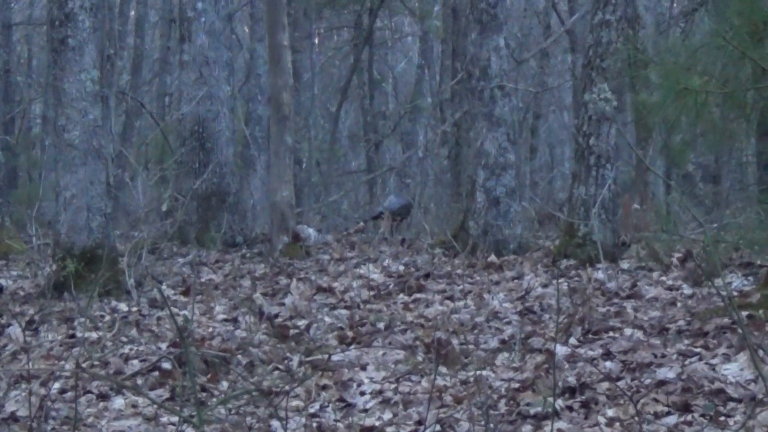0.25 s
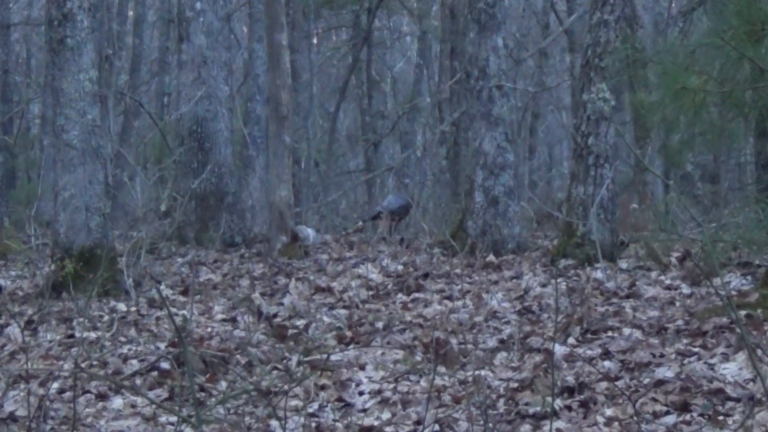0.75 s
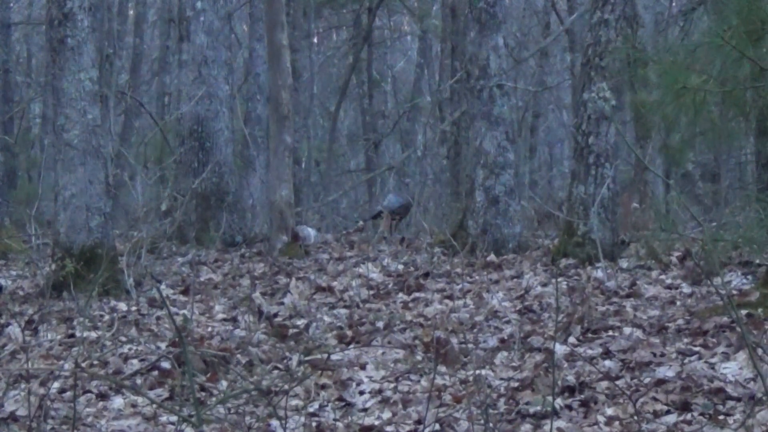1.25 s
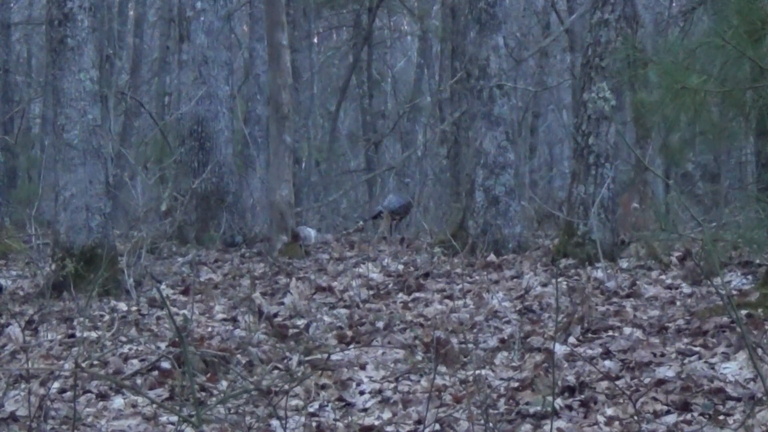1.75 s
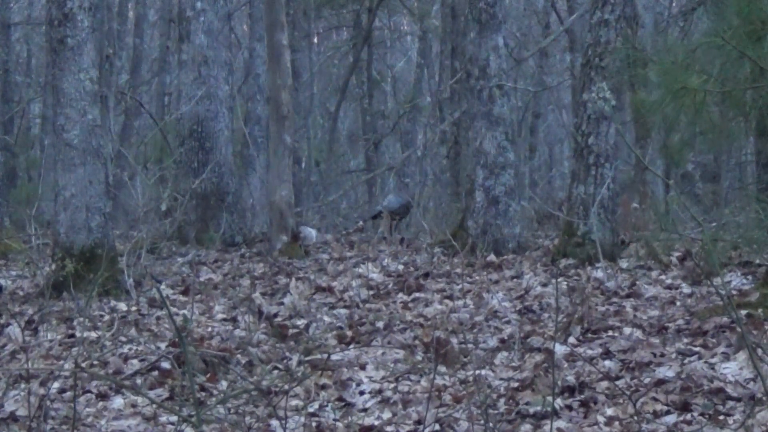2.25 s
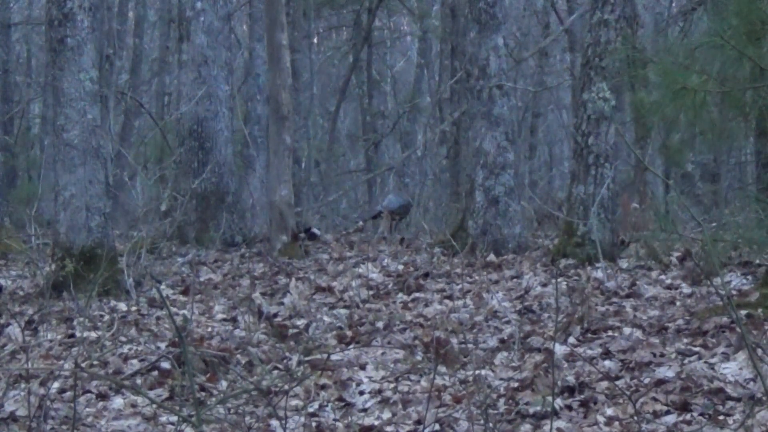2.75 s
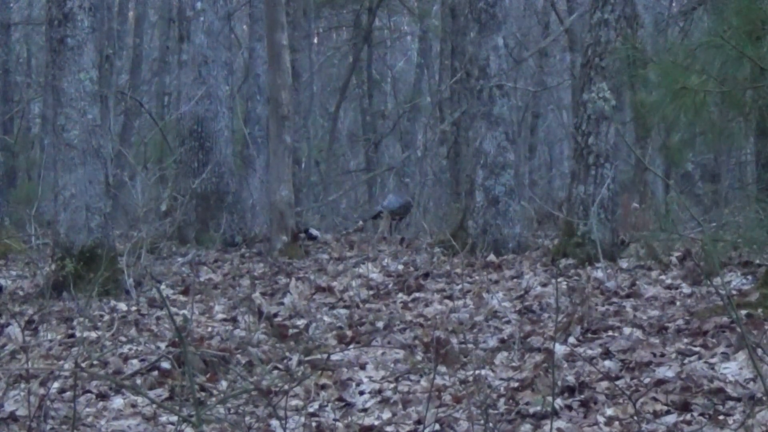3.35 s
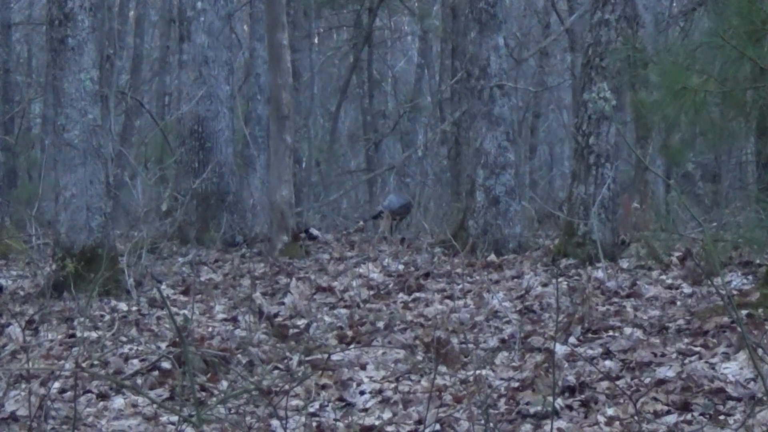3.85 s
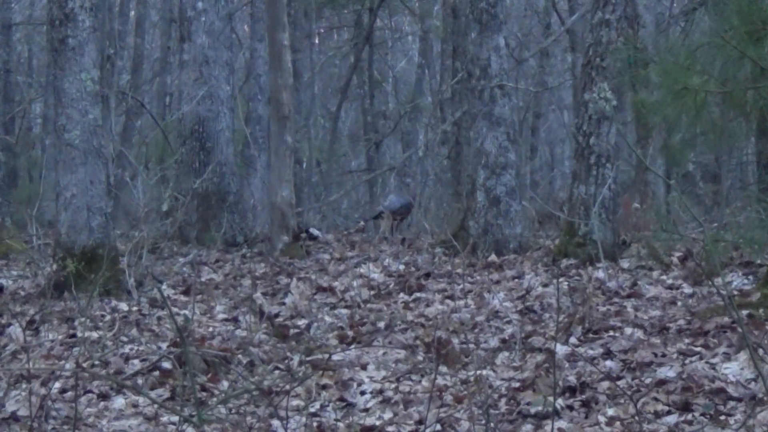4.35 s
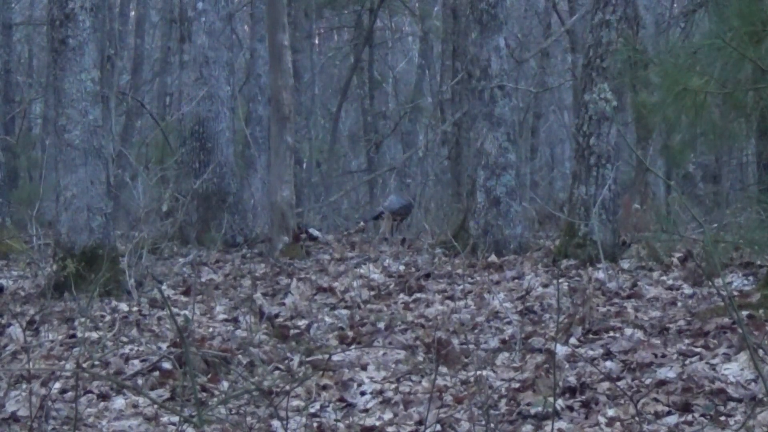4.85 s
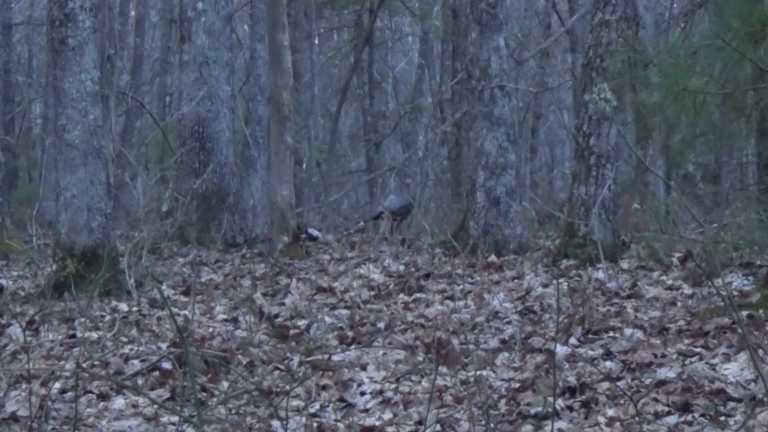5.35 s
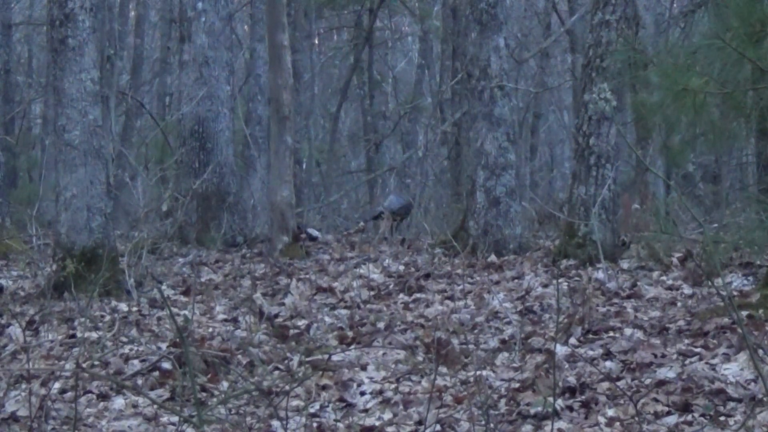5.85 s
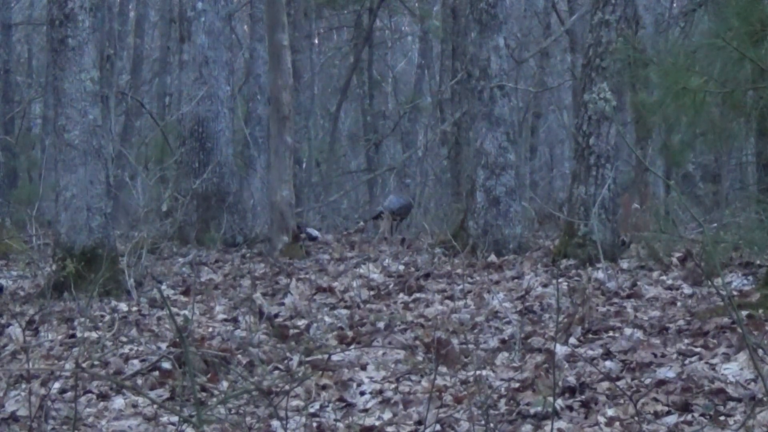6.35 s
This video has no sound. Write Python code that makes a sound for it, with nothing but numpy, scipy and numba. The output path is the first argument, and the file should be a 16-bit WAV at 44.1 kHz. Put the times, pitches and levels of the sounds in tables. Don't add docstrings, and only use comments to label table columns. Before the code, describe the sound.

Dry leaf litter crackles densely as large birds scratch on a forest floor, with sharp stem snaps and faint chirps over a soft hiss.

```python
import sys
import numpy as np
from scipy import signal
from scipy.fft import rfft, irfft, next_fast_len
from scipy.io import wavfile
from numba import njit

SR = 44100
rng = np.random.default_rng(int(sys.argv[2]) if len(sys.argv) > 2 else 0)


def output_pcm(signal):
    pcm = np.clip(np.atleast_2d(signal).T, -1, 1) * 32767
    wavfile.write(sys.argv[1], SR, np.round(pcm).astype(np.int16))


def how_loud(loudness_db):
    steps = np.asarray(loudness_db, float) / 20
    return 10 ** steps


N = 291501


def shaped(x, table):
    hz, db = np.transpose(table)
    size = next_fast_len(N + 8192)
    grid = np.maximum(np.arange(4097) * SR / 8192, 1)
    log_gain = np.interp(np.log(grid), np.log(hz), db) * np.log(10) / 20
    cepstrum = irfft(log_gain)
    cepstrum[1:4096] *= 2
    cepstrum[4097:] = 0
    impulse = irfft(np.exp(rfft(cepstrum)))
    return irfft(rfft(x, size) * rfft(impulse, size), size)[..., :N]


@njit
def ring(start, hz, cycles, size, side, turn):
    out = np.zeros((2, N + 8192))
    for k in range(len(start)):
        step = 2 * np.pi * hz[k] / SR
        decay_and_turn = np.exp(1j * step - hz[k] / (cycles[k] * SR))
        z = size[k] * np.exp(1j * turn[k])
        length = min(int(6 * cycles[k] * SR / hz[k]), 8000)
        for i in range(start[k], start[k] + length):
            out[0, i] += z.imag
            out[1, i] += z.imag * side[k]
            z *= decay_and_turn
    return out[:, :N]


def grains(s, hz, cycles, size, pan_db, scatter, chance):
    side = np.tanh(pan_db * np.log(10) / 40) + scatter * (2 * chance[0] - 1)
    sign = np.sign(chance[1] - .5)
    start = np.clip(s * SR, 0, N - 1).astype(np.int64)
    hz = np.clip(hz, 100., .42 * SR)
    cycles = np.clip(cycles, .2, 9)
    return ring(start.ravel(), hz.ravel(), cycles.ravel(), (size * sign).ravel(), side.ravel(),
                (.5 * chance[2]).ravel())


# pitch_hz, level_db [dB per Hz]
WIND_SPECTRUM = [(15, -50), (25, -49), (76, -6.5), (260, -12), (403, -5.5), (600, -5), (780, -21),
                 (1320, -120)]


def air():
    mid, side = shaped(rng.standard_normal((2, N)), WIND_SPECTRUM + [(1200, -76.5)])
    return how_loud(-64.5) / np.std(mid) * np.array([mid + 0.094 * side, mid - 0.15 * side])


# pitch_hz, level_db [dB per Hz]
HUSH_SPECTRUM = [(180, -20), (300, -11.5), (701, 10), (1390, 5.5), (2880, 8.5), (8790, -4.5), (10900, -16),
                 (15000, -6), (16000, -23)]


def hush():
    hiss = shaped(rng.standard_normal((2, N)), HUSH_SPECTRUM)
    side_db = -9.0
    return how_loud(-53.5) * hiss / np.std(hiss) * how_loud(np.array([[0], [side_db]]))


def calls(notes):
    out = np.zeros((2, N + SR))
    for s, ms, from_hz, to_hz, db, pan_db in notes:
        samples = ms * SR / 1000
        u = np.arange(int(samples * 2.1)) / samples
        waver = how_loud(4.0 * np.interp(u * ms / 5, np.arange(30), rng.standard_normal(30)))
        shape = np.minimum(u / 0.26, 1) * np.exp(-np.maximum(u - .7, 0) / 0.21) * waver
        blur = 1 + .008 * np.interp(u * ms / 7, np.arange(30), rng.standard_normal(30))
        hz = (from_hz + (to_hz - from_hz) * u) * blur
        tone = np.sin(2 * np.pi * np.cumsum(hz) / SR)
        level = how_loud(db + np.array([[pan_db], [-pan_db]]) / 2)
        at = int(s * SR)
        out[:, at:at + len(u)] += np.sqrt(2) * shape * tone * level
    return out[:, :N]


def chorus(birds, count):
    from_s, to_s, low_hz, high_hz, db = birds
    when, pitch, strength, drift = rng.random((count, 4)).T
    s = from_s + (to_s - from_s) * when
    hz = low_hz + (high_hz - low_hz) * pitch
    end_hz = hz * (.94 + 0.112 * drift)
    ms = 12 + 18 * strength
    return calls(np.transpose([s, ms, hz, end_hz, db + 5.8 * strength, 7.8 * drift - 5.0]))


# start_s, end_s, low_hz, high_hz, level_db [rms of a note]
DEEP_WOOD_BIRDS = (5, 6.6, 3500, 4911, -66.5)
# start_s, end_s, low_hz, high_hz, level_db [rms of a note]
NEARER_TWITTER = (1.95, 2.25, 3400, 4600, -68)


def songbirds():
    return chorus(DEEP_WOOD_BIRDS, count=1100) + chorus(NEARER_TWITTER, count=40)


# start_s, length_ms, pitch_hz, level_db [rms], left_minus_right_db
CHIRP_NOTES = [(0.511, 8.7, 5500, -37, -10), (1.057, 6, 4070, -37, -3), (1.93, 22, 3350, -55, 14),
               (1.95, 36, 3510, -57, 8), (2.02, 31, 3500, -56, 6), (2.045, 26, 4120, -52, 3.5),
               (2.1, 50, 3480, -57, 6), (2.16, 22, 3460, -55, 6), (1.89, 80, 1146, -63, 0),
               (2.18, 110, 1160, -63, 6), (2.28, 90, 1170, -60, 0), (2.41, 140, 1170, -61.5, 6),
               (2.56, 87, 1130, -63, 2), (1.98, 30, 3500, -52, 5), (2.055, 32, 3480, -54, 6),
               (2.075, 25, 4370, -52, 3.5), (2.112, 36, 4120, -54, 3.5), (4.17, 20, 700, -47, -2.5),
               (4.2, 21, 712, -48.5, -2.5), (4.19, 16, 3940, -41, -5.5), (5.2, 44, 3520, -60, -7),
               (5.245, 36, 2950, -56, -12), (5.29, 59, 3430, -53, -10), (6.017, 12, 1145, -43.5, -5.5)]


def chirps():
    return calls([(s, ms, hz, hz, db, pan_db) for s, ms, hz, db, pan_db in CHIRP_NOTES])


# start_s, length_ms, pitch_hz [at start], level_db [rms],
# left_minus_right_db
CLUCK_NOTES = [(4.748, 6.5, 956, -45, 2), (4.836, 6.6, 1320, -44.5, 3), (4.886, 6, 1030, -44.5, 2),
               (.758, 4.5, 3420, -35, -1), (.7725, 3.8, 1340, -32.5, 10), (1.032, 3.7, 1630, -40, 14),
               (1.243, 1.76, 3900, -25, 3), (2.325, 5.1, 1390, -48, 17.5), (2.9285, 2, 4070, -33, 2),
               (3.072, 11.3, 845, -39.5, 4), (4.058, 8.5, 1096, -42, 2), (4.443, 8.4, 3730, -29.5, -11),
               (4.595, 11, 5910, -35, -5.5), (4.619, 4.9, 1085, -30.5, -1)]


def clucks():
    return calls([(s, ms, hz, hz * (1 - 0.07), db, pan_db) for s, ms, hz, db, pan_db in CLUCK_NOTES])


def knocks(table, count, ms, cycles, octaves, db):
    s, peak_db, hz = np.transpose(table)[..., None]
    delay, pitch, side, sign, phase = rng.random((len(table), count, 5)).transpose(2, 0, 1)
    later = np.arange(count) > 0
    own_hz = hz * 2 ** (later * octaves * (pitch - .5))
    size = how_loud(peak_db + db) * np.where(later, .7 * (1 - delay), 1)
    start = s - .5 * cycles / hz + later * delay * ms / 1000
    chance = np.array([side, sign, phase])
    return grains(start, own_hz, cycles + 0 * own_hz, size, 1. + 0 * size, 0.34, chance)


# start_s, level_db [peak], pitch_hz
TOE_TAPS = [(.0035, -41, 610), (.081, -37, 483), (.134, -32, 1000), (.1916, -35, 746), (.222, -31, 1100),
            (.2951, -38, 750), (.305, -40, 420), (.3293, -39, 2600), (.449, -31, 1190), (.5323, -29, 1500),
            (.5445, -31, 2190), (.5455, -25.5, 3800), (.9132, -48, 520), (.9593, -34, 2600),
            (1.0075, -41, 1000), (1.1072, -38, 1570), (1.2435, -30, 2300), (1.2684, -43, 2700),
            (1.3896, -38, 2500), (1.8119, -46, 770), (2.1396, -45, 420), (2.186, -50.5, 450),
            (2.3362, -48, 600), (3.019, -35.5, 1400), (3.1077, -42, 1200), (3.161, -43, 645),
            (3.212, -31, 2100), (3.2571, -37, 1900), (3.285, -37, 3300), (3.294, -34, 3230),
            (3.3561, -43, 496), (3.6699, -39, 1800), (4.0785, -40, 1600), (4.3159, -40, 1000),
            (4.3506, -39, 700), (4.372, -48, 750), (4.386, -42, 750), (4.6217, -41, 750),
            (4.6355, -33, 1400), (4.6956, -34.5, 1800), (4.7594, -33, 1700), (4.817, -45, 454),
            (4.9004, -35, 1600), (5.1216, -49, 1700), (5.2097, -52, 1700), (5.8001, -43.5, 850),
            (5.856, -47, 437), (5.861, -40, 1300), (5.8635, -43.5, 402), (6.2041, -49, 600),
            (6.2263, -52, 600), (4.4465, -30, 3700), (4.36, -41, 1100), (4.464, -42, 650),
            (1.2428, -30, 1860), (1.244, -30, 3250), (.267, -33, 2500), (.241, -35, 1500),
            (3.235, -41, 1100), (3.078, -42, 700)]


def taps():
    return knocks(TOE_TAPS, count=3, ms=2.5, cycles=1.76, octaves=0.56, db=3.5)


# start_s, level_db [peak], pitch_hz
CRUMB_FLICKS = [(.0005, -18, 8500), (.0017, -25, 4500), (.0165, -24, 7600), (.0851, -22, 8500),
                (.0895, -28, 8500), (.1472, -35, 5500), (.1631, -38, 12500), (.1714, -27, 8800),
                (.1744, -27, 9500), (.1966, -31, 12500), (.2073, -27, 6500), (.3505, -38, 8500),
                (.4435, -30, 5500), (.5116, -27, 4040), (.5889, -34, 5000), (.5917, -34, 4960),
                (.5971, -37, 5000), (.7046, -31, 4000), (.7124, -32, 13000), (.7471, -30.5, 6000),
                (.8568, -36, 4500), (.9027, -41, 12500), (.9344, -28, 9500), (1.1382, -42, 12500),
                (1.5495, -37, 8800), (1.762, -38, 8800), (1.9538, -41, 12500), (2.4472, -38, 12500),
                (2.6562, -31, 9600), (2.6944, -32, 8200), (2.7014, -40, 13000), (2.769, -29.5, 8900),
                (2.8144, -33, 11000), (2.8403, -25, 9500), (3.099, -30.5, 8000), (3.212, -41, 12000),
                (3.2566, -30, 8500), (3.4751, -40, 11500), (3.7809, -34, 4500), (3.8834, -37, 12500),
                (4.2416, -30.5, 4460), (4.3105, -35, 10500), (4.3549, -31, 3200), (4.3568, -26, 3970),
                (4.3724, -27, 9500), (4.4024, -35, 10000), (4.4429, -27, 8000), (4.5564, -29, 6000),
                (4.5888, -29, 4500), (4.6242, -24.5, 3460), (4.6639, -29, 8800), (4.6699, -31, 8500),
                (4.7791, -43, 12500), (5.2568, -28, 8800), (5.5526, -30.5, 8860), (5.6963, -27.5, 4850),
                (5.8744, -36, 13000), (5.949, -36, 11000), (6.4, -43, 12500), (1.2427, -30, 6000)]


def flicks():
    return knocks(CRUMB_FLICKS, count=4, ms=1.2, cycles=2.4, octaves=0.6, db=5.5)


# pitch_hz, level_db [dB per Hz]
LEAF_COLOUR = [(120, -27.5), (200, -12), (482, -3), (558, -4), (709, -0.5), (1680, -1), (2020, -1),
               (2960, 0), (4520, -1), (8580, 1), (10500, -2.5), (15100, -17), (16000, -12)]


def leaf_colour_db(hz):
    table_hz, table_db = np.transpose(LEAF_COLOUR)
    return np.interp(np.log(hz), np.log(table_hz), table_db)


# start_s, level_db [peak], pitch_hz, left_minus_right_db, bright_part_db
STEM_BREAKS = [(0.0017, -19.5, 2930, 6, -5), (0.329, -34, 2800, 17, -8), (0.5113, -11.5, 3070, -4, -17),
               (0.7124, -18, 2710, -3, -13), (0.7322, -14.5, 2230, -3, -6.5), (0.7602, -16.5, 3060, 0, -13),
               (0.7755, -28, 1250, -3, -26), (1.0341, -14, 1620, 12, -22), (1.0586, -22, 4090, -7, -6.5),
               (1.2425, -5, 2940, 2, -30), (1.4921, -18.5, 2890, 10, -6), (2.455, -23, 2340, 13, -4),
               (3.3545, -21.5, 4560, 3, -3), (4.0626, -22, 1040, -1, -13), (4.1973, -15.5, 3960, -11, -27),
               (4.3638, -18, 3800, -9, -8), (4.4465, -27, 3550, -5.5, 7), (4.5427, -17, 2790, 1, -10),
               (4.5889, -27, 4050, -2.5, -13.5), (4.6205, -13, 875, -1, -7), (4.6476, -19, 3010, 0.5, -26),
               (5.021, -20, 2990, 1.5, 1.5), (5.2784, -27, 1510, -3, 3.5), (5.6174, -27, 4350, -3, -7)]
# start_s, level_db [peak], pitch_hz, dull_part_db
LEFT_BIRD_TICKS = [(0.0164, -12.5, 8010, -16), (0.0827, -12, 6980, 2), (0.2072, -12.5, 8100, -17.5),
                   (0.3177, -31, 8010, -11.5), (0.4429, -17, 5470, -3), (0.5846, -17, 8230, -3),
                   (0.6929, -19, 7670, -11.5), (1.0278, -19.5, 5670, 0), (2.1137, -17, 6800, -23),
                   (2.4469, -23, 6330, -11), (2.584, -26.5, 3960, -2), (2.6941, -39, 7840, -17),
                   (2.8404, -15, 8900, -41), (2.9294, -8, 9400, -10), (3.438, -21, 8400, -20),
                   (3.4662, -25, 7710, -10), (3.6661, -23, 9170, -4), (3.682, -19.5, 8870, -25.5),
                   (3.8833, -23, 6720, -18), (4.5585, -15, 6800, -23), (4.8232, -18.5, 5460, -4),
                   (4.9722, -23.5, 4520, -17), (5.0792, -20, 6160, -3.5), (5.1502, -20, 8700, -20),
                   (5.1745, -22, 7280, -14), (5.3433, -16.5, 4800, -21), (5.6961, -20, 6460, -27),
                   (5.8741, -14, 9300, -28), (5.9214, -31, 8140, -19), (5.9666, -26, 8440, -14)]
# start_s, level_db [peak], pitch_hz, dull_part_db
RIGHT_BIRD_TICKS = [(0.6103, -14, 7400, -24), (0.6226, -31, 8870, -15), (0.9234, -18, 8310, -18),
                    (0.973, -19, 9000, -27), (1.3602, -17, 1810, -16), (1.5271, -22, 6760, -20),
                    (1.5625, -26.5, 8310, -19), (1.5942, -23, 6750, -26), (1.7663, -16.5, 6760, -18),
                    (1.917, -19, 5560, -11), (2.359, -30, 8100, -13), (2.3813, -21, 8840, -21),
                    (2.6559, -23.5, 9150, -25), (2.7016, -20, 6100, -23), (2.8144, -19.5, 9300, -28),
                    (2.8263, -22, 8480, -15), (3.3676, -23, 6800, -19.5), (3.4528, -30, 7800, -14),
                    (3.8073, -25, 4610, -14.5), (4.5084, -18, 5940, -6), (4.5987, -21, 5540, -25),
                    (5.0432, -14, 8160, -16), (5.2354, -20.5, 5760, -26), (5.4987, -23.5, 5680, -18),
                    (5.914, -23, 7320, -21), (6.0353, -20, 8960, -20), (6.2737, -16, 8440, -27),
                    (6.289, -26, 3750, -17), (6.3899, -18, 8640, -16), (6.4815, -20, 6760, -7)]


def all_breaks():
    stem_dull_db, tick_bright_db = -5.5, -5
    left_pan_db, right_pan_db = 4, -2.5
    rows = [(s, db, hz, pan_db, stem_dull_db, bright_db) for s, db, hz, pan_db, bright_db in STEM_BREAKS]
    for table, pan_db in ((LEFT_BIRD_TICKS, left_pan_db), (RIGHT_BIRD_TICKS, right_pan_db)):
        rows += [(s, db, hz, pan_db, dull_db, tick_bright_db) for s, db, hz, dull_db in table]
    return np.array(rows)


def snaps(count, ms, cycles, delay_ms, ring_db, follow_db):
    s, db, hz, pan_db, dull_db, bright_db = all_breaks().T[..., None]
    wait, pitch, phase, loud, length, side = rng.random((len(s), count, 6)).transpose(2, 0, 1)
    part = np.arange(count) % 3
    first = np.arange(count) < 3
    phase, length = np.where(first, .6, phase), np.where(first, .6, length)
    late = np.where(first, 0.026 * wait, wait)
    near_ring = hz * 2 ** np.where(first, 0, 0.3 * (pitch - .5))
    place = np.where(first, 0.49 + 0.43 * pitch, pitch)
    own_hz = np.choose(part, [near_ring, 1700 * 3.0 ** place, 6500 * 1.77 ** place])
    own_db = ring_db + np.where(hz < 3500, np.minimum(dull_db + 0.5, 0), 0)
    part_db = np.choose(part, [own_db, dull_db - 6.5, bright_db + 3.0])
    shape = np.where(first, 1, how_loud(follow_db) * loud * np.exp(-2.5 * late))
    size = how_loud(db + part_db - leaf_colour_db(own_hz)) * shape
    start = s + (delay_ms + late * ms) / 1000
    return grains(start, own_hz, cycles * (.5 + length), size, pan_db, 0.25, np.array([side, length, phase]))


# start_s, level_db [peak], pitch_hz [centre], left_minus_right_db, length_ms
HEAP_CRUNCHES = [(.068, -12, 5540, 6, 25.7), (.18, -21, 2510, 6, 39), (0.425, -18, 6430, 6, 47),
                 (0.694, -29.5, 3260, -4, 32), (0.731, -25.5, 3450, -6.5, 34), (3.013, -29, 3600, 8.5, 21),
                 (3.044, -23, 7260, 7, 27), (3.14, -27, 3600, -5.5, 44), (4.163, -32, 2000, -5, 18.6),
                 (4.193, -27, 3450, -10, 17.3), (4.342, -23, 2040, -9, 35), (4.362, -21, 8900, 4, 20),
                 (4.4415, -22, 5100, -5.5, 9.6), (4.508, -23, 6640, 4, 23), (4.531, -16.5, 7200, 4.5, 28),
                 (4.585, -25, 5530, 0.5, 24), (4.612, -26, 1930, -9, 20.5), (4.637, -29.5, 3000, -1, 37),
                 (5.34, -28.5, 6550, 2, 11), (0.201, -21, 2180, 4, 97), (.385, -18, 8000, -2, 60)]


def crunches(count, swell, fade, cycles, follow_db):
    s, db, hz, pan_db, ms = np.transpose(HEAP_CRUNCHES)[..., None]
    bits = rng.random((len(HEAP_CRUNCHES), count, 6)).transpose(2, 0, 1)
    late, pitch, phase, loud, length, side = bits
    octaves = 0.94 * 2 * (pitch + phase - 1)
    own_hz = np.clip(hz * 2 ** octaves, 300., 15000.)
    shape = loud ** 1.54 * np.minimum(late / swell, 1) * np.exp(-fade * late)
    size = how_loud(db + follow_db - leaf_colour_db(hz)) * shape * (own_hz / hz) ** 0.67
    start = s + late * ms / 1000
    return grains(start, own_hz, cycles * (.5 + length), size, pan_db, 0.26, np.array([side, length, phase]))


def trunks(x, t60_s, db):
    t = np.arange(int(.12 * SR)) / SR
    decay = np.exp(-np.log(1000) * t / t60_s) * np.minimum(t / 0.00019, 1)
    haze = rng.standard_normal((2, len(t))) * decay
    haze = haze / np.sqrt(np.sum(haze[0] ** 2))
    return how_loud(db) * signal.fftconvolve(x[None], haze, axes=1)[:, :N]


# start_s, effort_db, depth_db [how deep the feet dig],
# left_minus_right_db
SCRATCHING = [(0.0, 21, -20, 4), (0.03, 14, -7, 2), (0.26, 9, -1.5, 1.5), (0.51, 7.5, -4, 0.5),
              (0.64, 3, -3, -0.5), (0.76, 3, 3, 0), (1.0, 5.5, -2.5, 1), (1.24, 0, -0.5, 0.5),
              (1.62, -2, -2.5, -0.5), (2.6, -2.5, 2, 1.5), (2.9, -2.5, 2, 0), (3.2, 1.5, 4, -2.5),
              (3.42, -1, -1.5, 0.5), (4.12, 1, -1, -0.5), (4.36, 1.5, 4, 0), (4.62, 6.5, -3, -0.5),
              (4.88, 1, 0.5, 0), (6.61, 0, -3.5, 0)]
LEAF_SIZE_HZ = (800, 3260, 8500)
# rest_db, effort_slope [dB per dB], depth_slope [dB per dB]
LEAF_ANSWERS = [
    (-0.23, 1.5252, 1.43),
    (1.6, 1.2141, 0.38),
    (-0.9, 0.82, 0.02),
]


def crackle(count, order, smear_ms, uneven_db, kin, cycles, db, least=0):
    when, hardness, leaf_side, leaf_small = rng.random((count, 4)).T[..., None]
    late, kinship, side, sign, length = rng.random((count, order, 5)).transpose(2, 0, 1)
    s = when * N / SR + smear_ms / 1000 * late ** 2
    small = abs((leaf_small + kin * (kinship - .5) + 1) % 2 - 1)
    small = least + (1 - least) * small
    hz = (13 + 109 * small) ** 2
    stir_s, *stir_columns = np.transpose(SCRATCHING)
    effort_db, depth_db, pan_db = (np.interp(s, stir_s, column) for column in stir_columns)
    place = np.interp(np.log(hz), np.log(LEAF_SIZE_HZ), (0, 1, 2))
    stir_db = 0
    for k, (rest_db, by_effort, by_depth) in enumerate(LEAF_ANSWERS):
        share = np.maximum(1 - abs(place - k), 0)
        stir_db = stir_db + share * (rest_db + by_effort * effort_db + by_depth * depth_db)
    hard_db = -uneven_db * np.log(0.13 + hardness) - 6.1 * late ** 2
    size = how_loud(stir_db + hard_db + db) * (hz / 3000) ** .75
    chance = np.array([0.66 * leaf_side + 0.43 * side, sign, 9 * length])
    return grains(s, hz, cycles * (.5 + length), size, pan_db, 0.75, chance)


def without_bass(x, cut_hz):
    return signal.sosfilt(signal.butter(2, cut_hz, "high", fs=SR, output="sos"), x)


# pitch_hz, side_minus_mid_db
PORT_WIDTH = [(60, -17), (110, -21), (200, -18), (380, -12), (700, -9.5), (1290, -7), (2380, -8),
              (4400, -6), (8120, -9), (15000, -14.5)]


def stereo_ports(mid, side):
    side = shaped(side, PORT_WIDTH) * how_loud(8.5)
    return np.array([mid + side, mid - side])


def scene():
    breaks = snaps(count=15, ms=4.9, cycles=1.0, delay_ms=-.15, ring_db=-1.5, follow_db=-1)
    breaks = breaks + crunches(count=120, swell=0.24, fade=1.21, cycles=1.44, follow_db=0.0)
    breaks = breaks + trunks(breaks[0], t60_s=0.017, db=-3) * np.array([[1], [.4]])
    breaks = without_bass(breaks, 750)
    far = crackle(count=12000, order=6, smear_ms=14., uneven_db=1.23, kin=1.5, cycles=1.16, db=-44.0)
    near = crackle(count=1000, order=8, smear_ms=2.2, uneven_db=4.0, kin=0.596, cycles=1.0, db=-43.0)
    crumbs = crackle(count=600, order=5, smear_ms=1.5, uneven_db=2.0, kin=0.56, cycles=1.45, db=-41.5,
                     least=0.64)
    litter = shaped(far + near + crumbs + breaks, LEAF_COLOUR)
    feet = without_bass(flicks() + taps(), 220)
    mid, side = litter + hush() + feet
    birds = chirps() + clucks() + songbirds()
    return stereo_ports(mid, side) + birds + air()


def low_pass(x):
    return signal.sosfilt(signal.butter(12, 15900, fs=SR, output="sos"), x)


def record(dry):
    cut = signal.sosfilt(signal.ellip(8, .2, 25, 15900, fs=SR, output="sos"), dry)
    return low_pass(cut)


dry = scene()
out = record(dry)
output_pcm(out)
```